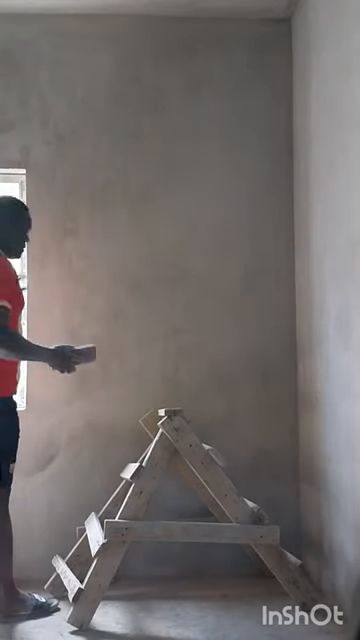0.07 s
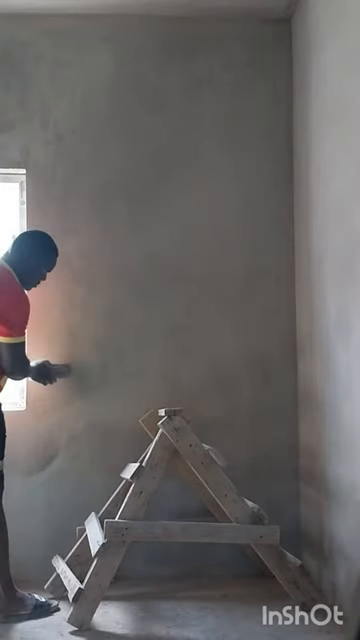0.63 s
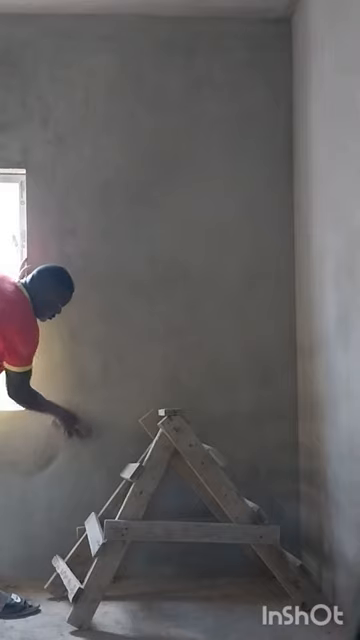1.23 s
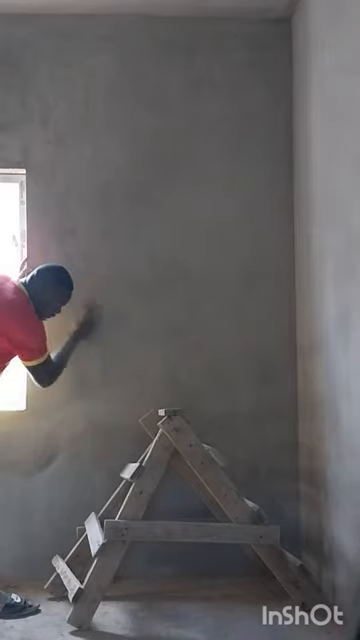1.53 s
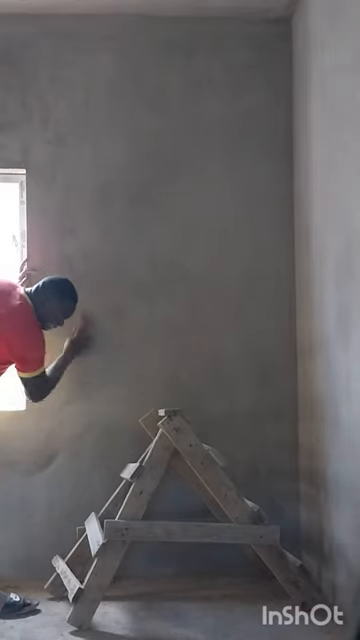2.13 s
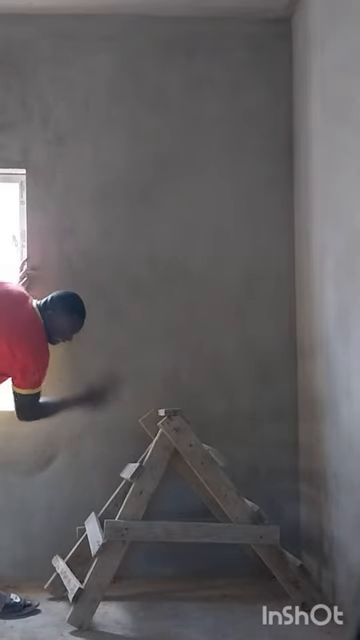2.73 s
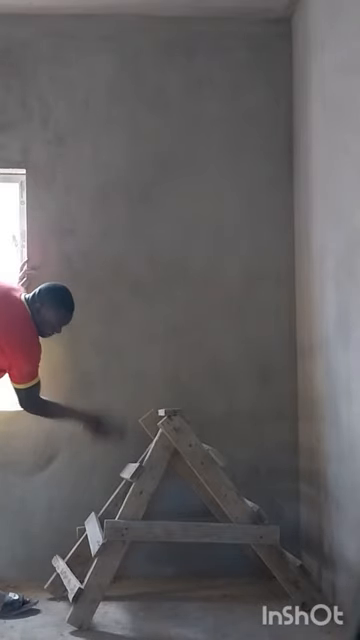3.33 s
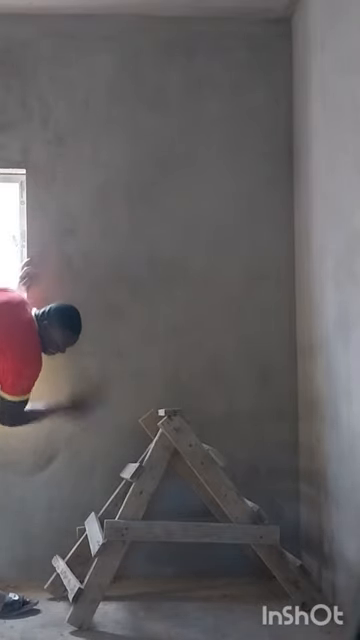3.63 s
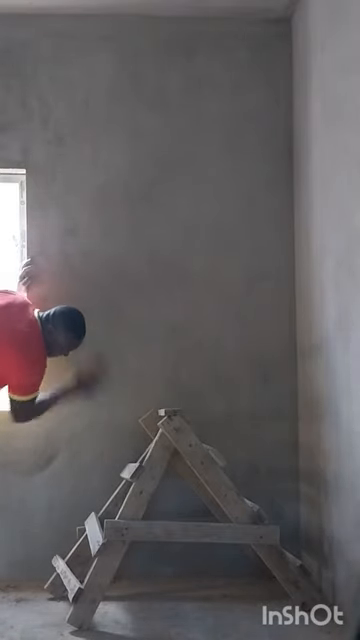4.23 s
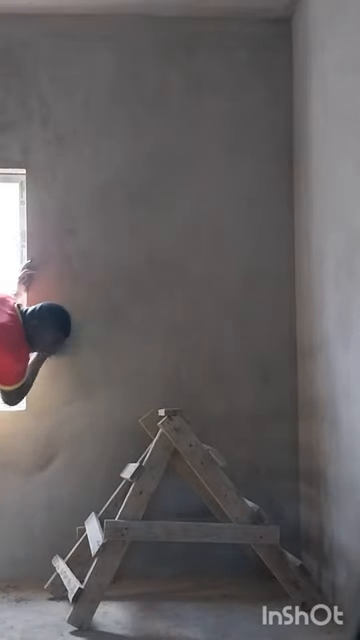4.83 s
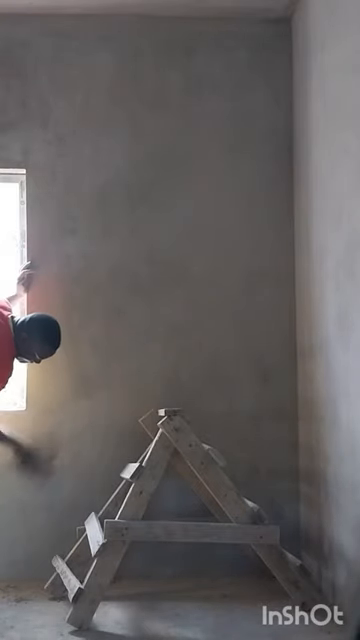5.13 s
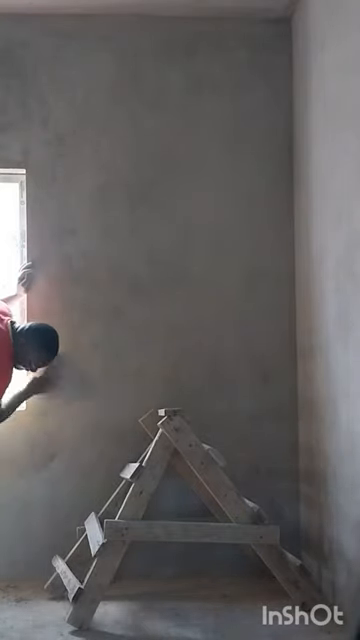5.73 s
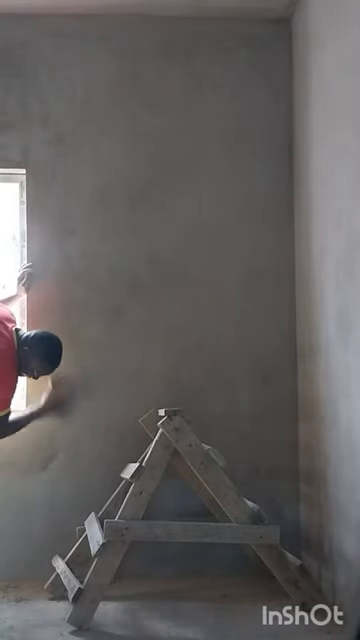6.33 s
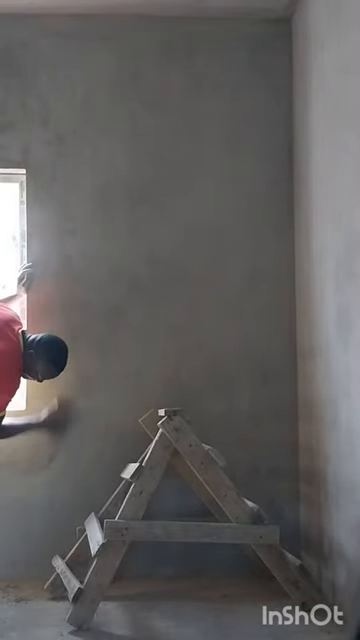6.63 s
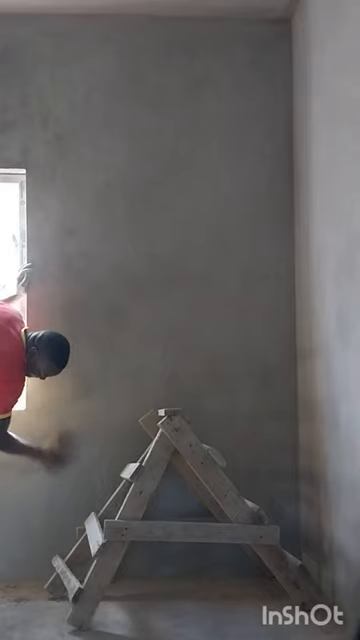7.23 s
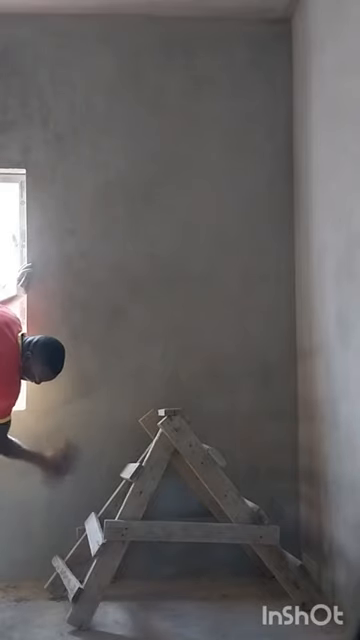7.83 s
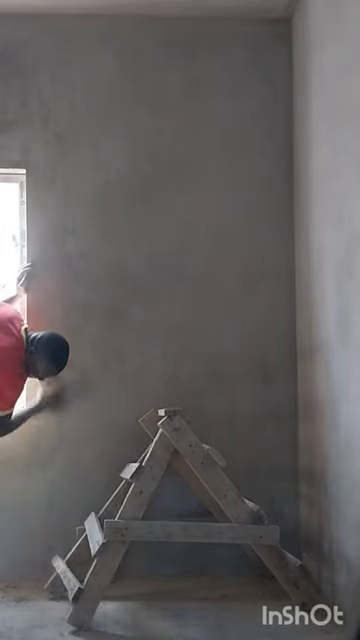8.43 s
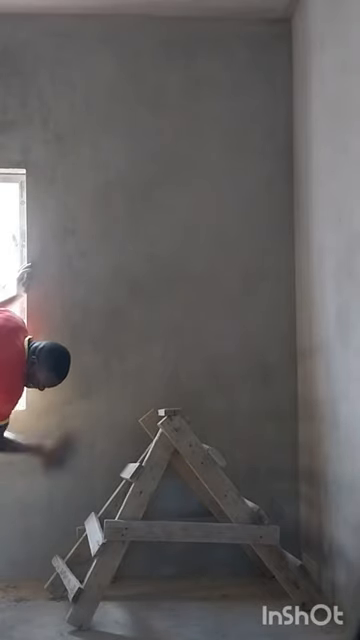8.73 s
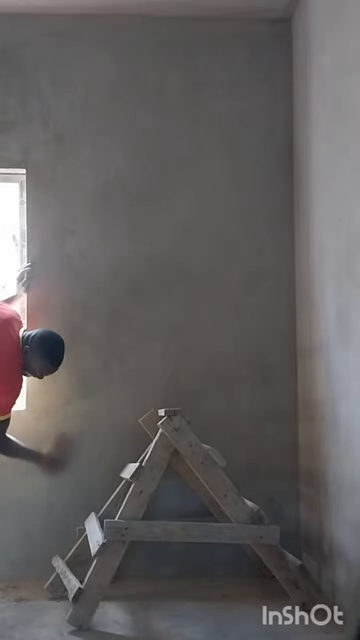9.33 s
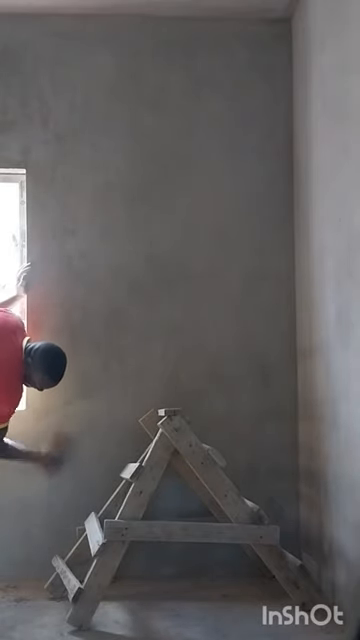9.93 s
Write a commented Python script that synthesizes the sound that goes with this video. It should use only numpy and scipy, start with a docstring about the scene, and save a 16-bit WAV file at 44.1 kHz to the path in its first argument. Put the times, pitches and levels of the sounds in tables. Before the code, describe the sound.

In a bare, echoing room, a block is handled softly and then rubbed to and fro over a cement-plastered wall. The first scrape is rough, and the long hissing strokes that follow become short and quick later on. Sand grains rasp under the block, with an occasional thin zing and a slight low rumble from the rubbing. The microphone is a few metres off, and a faint hum wavers in the background.

```python
"""A hand-held block scrubs to and fro over a cement-plastered wall in a bare, echoing room.
After a little handling it meets the wall with a gruff scrape; long arcs then turn into short strokes.
Sand grains catch and snap under it, making a gritty hiss and shaking the block and the wall.
Now and then a hard grain drags with a zing. A faint hum wavers in the background.
A pair of microphones listens from a few metres away."""
import sys
import numpy as np
from scipy import signal
from scipy.fft import rfft, irfft, next_fast_len
from scipy.io import wavfile
from scipy.ndimage import uniform_filter1d

SR = 44100
rng = np.random.default_rng(int(sys.argv[2]) if len(sys.argv) > 2 else 0)


def materialize(psi):
    """Save the field psi as 16-bit PCM at rate SR to the path in sys.argv[1].

    A 1-D psi becomes a single channel; in a 2-D psi each row is a channel.
    """
    bounded = np.clip(np.atleast_2d(psi).T, -1, 1)
    quanta = np.round(bounded * 32767).astype(np.int16)
    wavfile.write(sys.argv[1], SR, quanta)


N = 440559
TIME = np.arange(N) / SR

# strokes, up and down in turn, each lasting until the next:
# t/s, moment of top speed/share of the stroke, pressure/dB, fineness of the sand/dB
STROKES = [(0.691, 0.93, -6, -3.5), (0.865, 0.6, 3.5, -1.2), (1.222, 0.49, 2.5, -3.5),
           (1.552, 0.43, 1.6, 1.6), (1.904, 0.68, -0.5, -1), (2.221, 0.52, 1, 1.5),
           (2.466, 0.53, 2.5, -2.1), (2.715, 0.56, 2, 0.9), (2.927, 0.36, 2.3, -1), (3.145, 0.73, 0.6, 2.3),
           (3.334, 0.44, 0.5, 0.5), (3.601, 0.61, 0.4, 3.5), (3.828, 0.36, 0.4, 0), (4.183, 0.71, -3, 5.7),
           (4.471, 0.51, 1.4, -0.3), (4.853, 0.77, -2, 3), (5.137, 0.54, 0.3, 0), (5.387, 0.77, -1, 2.5),
           (5.591, 0.61, -0.5, 1), (5.841, 0.53, -0.5, 3), (6.047, 0.49, 1, -1.5), (6.35, 0.7, 0.9, 0.7),
           (6.568, 0.5, -0.5, -0.7), (6.811, 0.69, -0.8, 1), (7.014, 0.42, 0.5, -3.3),
           (7.189, 0.59, 0.4, -2.5), (7.362, 0.53, 0.3, -2.5), (7.485, 0.63, 1.0, -2.5),
           (7.632, 0.54, 0.8, -3), (7.758, 0.65, 1.2, -2.5), (7.893, 0.55, 0.5, -1.5),
           (8.032, 0.77, 2.0, -0.3), (8.2, 0.56, 0, 1), (8.451, 0.57, 1.5, 0.6), (8.699, 0.64, 1.7, -3),
           (8.961, 0.62, 0, 1.5), (9.145, 0.38, 0, -1.8), (9.315, 0.52, 0.5, -2.6),
           (9.466, 0.42, -1.4, -1.0), (9.608, 0.52, -0.2, -3), (9.776, 0.54, -1.2, -1.5),
           (9.909, 0.74, 1.7, -4)]
# how each sand sound follows the hand: level/dB, then dB added per dB of speed, pressure, fineness
HISS_RESPONSE = (-13, 1.25, 0.66, 1.0)
SCRAPE_RESPONSE = (-16, 0.49, 1.0, 0.5)
RASP_RESPONSE = (-24.5, .02, 1, 0.2)
# tone colours of the rubbing and tapping noises: f/Hz, level/dB
HISS_COLOUR = [(6800, -28), (8200, 0.5), (10000, -4.5), (12200, -1), (13500, 0.5), (16000, 1)]
SCRAPE_COLOUR = [(1800, -22.5), (2800, -7.5), (3600, -4.5), (5000, 1), (7400, 1), (8400, -0.5), (10500, -1),
                 (12500, -4.5)]
RASP_COLOUR = [(700, -20), (1150, -17.5), (1450, -9), (1750, -5), (2100, 0), (2450, -0.5), (3000, -2),
               (3800, -4), (6000, -15)]
EDGE_COLOUR = [(200, -11), (420, -11), (560, -7), (900, -6.5), (1080, -6.5), (1300, -5.5), (1550, 0.5),
               (1900, -2), (2500, -5.5), (4000, -9), (8000, -28)]
RUMBLE_COLOUR = [(20, -24), (38, -14), (52, 3), (72, -4), (98, 5.5), (110, -7), (123, 9.5), (140, 1.5),
                 (165, -1), (220, -50)]
TAP_COLOUR = [(200, -9), (700, 3), (1800, -1), (4000, -9), (7000, -20), (12000, -37)]
# the block first shuffles in the hand: t/s, half length/s, hiss/dB, scrape/dB, edge/dB
SHUFFLES = [(0.0, 0.042, -68, -59, -31.5), (0.163, 0.055, -54, -42.5, -40), (.5, 0.049, -67, -60, -47),
            (.63, 0.11, -67, -54, -40)]
# the block bites into coarse spots: t/s, half length/s, level/dB
BITES = [(.78, 0.03, -25), (1.01, 0.047, -24), (1.83, 0.043, -26.5), (2.41, 0.017, -18.5),
         (2.53, 0.03, -21.5), (3.42, 0.067, -27), (3.88, .06, -26), (4.43, 0.026, -20.5),
         (4.55, 0.045, -28.5), (5.2, 0.03, -40)]
# how easily things shake as the hand works down the wall: t/s, block/dB, wall/dB, rumble/dB
SHAKING = [(0.0, -45, -41, -45), (0.4, -55.5, -48.5, -49), (0.68, -41, -38, -46), (0.88, -27, -24.5, -40),
           (1.08, -45, -41, -42), (2.1, -40, -48, -58), (2.45, -46, -42.5, -50), (3.3, -50, -44, -52),
           (3.9, -38, -42, -47), (5.0, -38.5, -40, -51), (5.7, -46, -37, -52), (6.3, -37, -38.5, -50),
           (6.9, -29.5, -43, -47.5), (7.7, -30.5, -52, -50), (8.4, -32, -42, -50), (9.1, -30, -43.5, -51),
           (9.98, -30, -49, -48.5)]
# the notes at which the block, the wall and a hollow patch ring: f/Hz, width/Hz, level/dB
BLOCK_MODES = [(510, 150, -15), (655, 150, -3), (832, 120, 0), (909, 143, -0.5), (1237, 124, -1.5),
               (1745, 153, 1), (2280, 290, -0.5), (3310, 170, 4)]
WALL_MODES = [(176, 55, -1), (224, 59, 0), (265, 44, -2), (339, 40, -2), (428, 300, -12.5)]
PATCH_MODES = [(223.5, 30, 0)]
# how well their shaking passes into the air: f/Hz, level/dB
RADIATION = [(60, -22), (120, -21), (180, -2), (2400, 3.5), (4000, -8), (9000, -36)]
# dull thuds as weight shifts: t/s, half length/s, level/dB
THUDS = [(.275, 0.044, -40), (0.814, 0.043, -37.5), (2.81, .03, -39), (4.39, 0.032, -41), (5.3, .05, -48),
         (6.52, .035, -42), (9.464, 0.04, -48)]
# hard grains dragging: t/s, f/Hz, level/dB
ZINGS = [(.75, 3040, -31), (1.82, 4490, -16), (2.55, 2650, -26), (3.22, 7500, -35), (4.28, 7040, -31),
         (4.97, 6250, -29.5), (9.1, 7400, -22)]
# light taps as the block is gripped: t/s, level/dB
TAPS = [(0.476, -29.5), (0.596, -28)]
# tones of the hum: f/Hz, half the filter width/Hz, starting level/dB, fade/(dB per s)
HUM_TONES = [(124.3, 4.5, -48.5, 2.3), (339.6, 6.7, -50.5, 2), (503, 9.7, -49.5, 14)]
# how alike the echo is on the left and right: f/Hz, likeness (-1 to 1)
ECHO_LIKENESS = [(60, 0.51), (350, 0.88), (700, 0.67), (880, 0.019), (1100, -0.53), (1500, 0.15),
                 (2300, 0.074), (3500, -0.024)]
# tone colour of the two microphones: f/Hz, left/dB, right/dB
MIC_COLOUR = [(100, -2.2, 0.5), (550, -3, 3.5), (1200, 0, 5.5), (2200, -2.5, 3.5), (3370, -0.5, 5),
              (4720, 2, 5.5), (6160, 0, 5.5), (7180, 1, 9), (7610, -5.5, 7), (8300, -15, -4),
              (9000, -8.5, -5.5), (10100, -7, -0.1), (11700, -6.5, 1.9), (12440, -3.5, 5.5),
              (13300, -4, 6.5), (14700, -9.5, 1.5), (16000, -20, 5.5)]

TOUCH_S, TOUCH_ATTACK_S, LAST_STROKE_S = .714, .0072, .17   # the block meets the wall already moving
TURN_SPEED, CRUISE_PER_S = .022, 2   # share of top speed left at a turn; long strokes stay fast longer
LEAN_DB_PER_S, LEAN_LAG_STROKES = 5.5, .097   # the arm leans hardest just past the bottom of a long arc


def scrubbing():
    """One moving hand drives the sand, the ringing block and wall, and a low rumble."""
    contact, speed_db, press_db, fine_db = hand()
    pace = from_db(.27 * speed_db)   # a faster stroke meets more grains
    # the block judders over bumps and breaks off tiny clumps of sand
    catch = from_db(.65 * drift(71.66) + 1.5 * drift(1091))
    return (sand(contact, speed_db, press_db, fine_db, pace, catch)
            + block_and_wall(speed_db, press_db, pace, catch) + rumble(speed_db, press_db, pace, catch))


def hand():
    """Each stroke speeds up, then slows. Gives contact (0-1), then speed, pressure and fineness in dB."""
    starts, fastest, strength_db, fine_db = np.transpose(STROKES)
    turns = np.append(starts, starts[-1] + LAST_STROKE_S)
    phase = np.interp(TIME, turns, np.arange(len(turns)))
    stroke = np.minimum(phase.astype(int), len(starts) - 1)
    length_s = np.diff(turns)[stroke]
    done, top = phase - stroke, np.clip(fastest, .1, .9)[stroke]
    arch = np.sin(np.pi / 2 * np.minimum(done / top, (1 - done) / (1 - top)))
    cruise = .01 + CRUISE_PER_S * length_s
    arch = np.tanh(cruise * arch) / np.tanh(cruise)   # flatten the top
    speed_db = 20 * np.log10(TURN_SPEED + (1 - TURN_SPEED) * arch)
    lean_db = LEAN_DB_PER_S * length_s * np.cos(np.pi * (phase - LEAN_LAG_STROKES))
    # pressure and sand blend from one stroke into the next
    press_db, sand_db = uniform_filter1d([strength_db[stroke] + lean_db, fine_db[stroke]], int(.06 * SR))
    contact = np.clip((TIME - TOUCH_S) / TOUCH_ATTACK_S, 0, 1)
    return contact, *np.where(TIME >= TOUCH_S, [speed_db, press_db, sand_db], 0)


def sand(contact, speed_db, press_db, fine_db, pace, catch):
    """Grains hiss, scrape and rasp under the block and its edge. The bright hiss has the shortest echo."""
    hiss_gain, scrape_gain, rasp_gain = [
        contact * from_db(db + by_speed * speed_db + by_press * press_db + by_fine * fine_db)
        for db, by_speed, by_press, by_fine in (HISS_RESPONSE, SCRAPE_RESPONSE, RASP_RESPONSE)]
    hiss_shuffle, scrape_shuffle, edge_shuffle = sum(
        np.outer(from_db(levels), swell(s, half_s)) for s, half_s, *levels in SHUFFLES)
    bites = sum(from_db(db) * swell(s, half_s) for s, half_s, db in BITES)
    hiss = (hiss_gain + hiss_shuffle) * grit(HISS_COLOUR, 16000 * pace, catch, spread_db=1)
    scrape = (scrape_gain + scrape_shuffle) * grit(SCRAPE_COLOUR, 13500 * pace, catch, spread_db=2.5)
    rasp = (rasp_gain + bites) * grit(RASP_COLOUR, 8000 * pace, catch, spread_db=2)
    edge = (edge_dig() + edge_shuffle) * grit(EDGE_COLOUR, 3500, catch, spread_db=-2)
    return room(hiss, t60=.26) + room(scrape, t60=.55) + room(rasp, t60=.48) + room(edge, t60=1)


def grains(per_s, spread_db):
    """Grains snap at random moments. A spread above 0 makes a few louder, below 0 a few softer."""
    chance = np.clip(per_s / SR, 1e-3, 1)
    sizes = from_db(spread_db * np.minimum(rng.exponential(1, N), 5.5)) * rng.choice([-1, 1], N)
    return rms_one((rng.random(N) < chance) * sizes / np.sqrt(chance))   # same power at any rate


def grit(colour, per_s, catch, spread_db):
    """A stream of grains with one tone colour, louder where the block catches."""
    return rms_one(coloured(grains(per_s, spread_db) * catch, colour))


def edge_dig(start_s=.866, level_db=-17, attack_s=.043, hold_s=.065, release_s=.03):
    """Loudness of the edge digging into the plaster on the first downstroke: catch, hold, let go."""
    outside = np.maximum((start_s - TIME) / attack_s, (TIME - start_s - hold_s) / release_s)
    return from_db(level_db) * np.exp(-np.clip(outside, 0, 20))


def block_and_wall(speed_db, press_db, pace, catch, patch_s=3.5):
    """Grains set the block and wall ringing; a hollow patch booms as the block passes over it."""
    block_db, wall_db, _ = in_time(SHAKING)
    block_gain = from_db(block_db + .1 * speed_db + .65 * press_db)
    wall_gain = from_db(wall_db + .18 * speed_db + .63 * press_db)
    patch_gain = from_db(-37 - 6 * np.abs(TIME - patch_s))
    block = block_gain * resonate(grains(4000 * pace, spread_db=3) * catch, BLOCK_MODES)
    wall = wall_gain * resonate(grains(1500 * pace, spread_db=-.5), WALL_MODES)
    patch = patch_gain * resonate(grains(1500 * pace, spread_db=4.5), PATCH_MODES)
    return sum(room(coloured(part, RADIATION), t60=.74) for part in (block, wall, patch))


def rumble(speed_db, press_db, pace, catch):
    """The rubbing makes a deep shaking, with thuds as weight shifts."""
    _, _, rumble_db = in_time(SHAKING)
    gain = from_db(rumble_db + .52 * speed_db + .41 * press_db)
    thuds = sum(from_db(db) * swell(s, half_s) for s, half_s, db in THUDS)
    return room((gain + thuds) * grit(RUMBLE_COLOUR, 900 * pace, catch, spread_db=-2), t60=.32)


def zings():
    """A hard grain drags and makes the block sing briefly around one pitch."""
    return sum(from_db(db) * swell(s, half_s=.031) * narrow_noise(hz, filter_width_hz=720)
               for s, hz, db in ZINGS)


def taps(decay_s=.021):
    """Gripping the block makes short bursts of noise."""
    force = sum(from_db(db) * (TIME >= s) * np.exp(-np.abs(TIME - s) / decay_s) for s, db in TAPS)
    return force * rms_one(coloured(rng.standard_normal(N), TAP_COLOUR))


def hum():
    """Faint wavering tones slowly die away."""
    return sum(narrow_noise(hz, 2 * half_width) * from_db(db - fade * TIME)
               for hz, half_width, db, fade in HUM_TONES)


def room(x, t60, direct_db=-9, early_db=-5, early_t60=.035, tail_db=-2, left_lead_s=.000328):
    """Sound arrives directly, then off the near walls, then as a long echo."""
    size = next_fast_len(N + SR // 10, real=True)
    hz, spectrum = np.arange(size // 2 + 1) * SR / size, rfft(x, size)
    direct = irfft(spectrum * np.exp(-2j * np.pi * hz * [[0], [left_lead_s]]), size)[:, :N]
    # the hand keeps moving, so the echoes blur into noise with the colour of their source
    colour = np.sqrt(np.abs(uniform_filter1d(np.abs(spectrum) ** 2, size=141)))
    alike = np.clip(at_hz(ECHO_LIKENESS, hz), -.99, .99)
    mid, side = rfft(rng.standard_normal((2, size)))
    stereo_noise = np.sqrt(1 + alike) * mid + np.sqrt(1 - alike) * side * [[1], [-1]]
    echoes = irfft(colour * stereo_noise, size)[:, :N]
    early = from_db(early_db) ** 2 * lingering(x ** 2, early_t60)
    tail = from_db(tail_db) ** 2 * lingering(x ** 2, t60)
    # an echo cannot swell faster than a few of its own cycles
    cycle_s = 1 / np.average(hz, weights=colour ** 2)
    energy = np.abs(uniform_filter1d(early + tail, size=1 + int(4 * cycle_s * SR)))
    return from_db(direct_db) * direct + np.sqrt(energy) * rms_one(echoes)


def lingering(power, t60):
    """Sound energy dies away by 60 dB in t60 seconds."""
    keep = from_db(-120 / (t60 * SR))
    return signal.lfilter([1 - keep], [1, -keep], power)


def resonate(x, modes):
    """Let x ring at several notes at once, added with alternating signs; the result has power 1."""
    out = 0
    for k, (hz, width, db) in enumerate(modes):
        keep = np.exp(-np.pi * width / SR)
        feedback = [1, -2 * keep * np.cos(2 * np.pi * hz / SR), keep * keep]
        out = out + (-1) ** k * from_db(db) * signal.lfilter([1 - keep, 0, keep - 1], feedback, x)
    return rms_one(out)


def narrow_noise(hz, filter_width_hz):
    """Noise filtered twice around one pitch becomes a wavering tone."""
    mode = [(hz, filter_width_hz, 0)]
    return resonate(resonate(rng.standard_normal(N), mode), mode)


def coloured(x, colour):
    """Filter x by a curve of f/Hz, level/dB."""
    size = next_fast_len(N + SR // 10)
    hz = np.arange(size // 2 + 1) * SR / size
    return irfft(rfft(x, size) * from_db(at_hz(colour, hz)), size)[..., :N]


def drift(per_s):
    """A random wobble of size about 1 that takes per_s steps a second."""
    knots = rng.standard_normal(N // 10)
    return np.interp(TIME * per_s, np.arange(len(knots)), knots) * np.sqrt(3 / 2)


def swell(s, half_s):
    """A smooth rise and fall, reaching 1 at time s."""
    return np.exp(-np.minimum(((TIME - s) / half_s) ** 2, 50))


def in_time(rows):
    """Read each column of a time table at every sample."""
    s, *columns = np.transpose(rows)
    return [np.interp(TIME, s, column) for column in columns]


def at_hz(points, hz):
    """Read a frequency table, with octaves evenly spaced."""
    table_hz, values = np.transpose(points)
    return np.interp(np.log(hz + 1e-6), np.log(table_hz), values)


def from_db(db):
    """Turn decibels into a gain."""
    return 10 ** (np.asarray(db) / 20)


def rms_one(x):
    """Scale x to an average power of 1."""
    return x / np.sqrt(np.mean(x ** 2) + 1e-20)


def scene():
    """Scrubbing and handling ring through the bare room, over a faint hum."""
    return scrubbing() + room(zings(), t60=1) + room(taps(), t60=1, direct_db=-14) + hum()


def record(dry, low_cut_hz=48, high_cut_hz=15850):
    """Each microphone colours its side and clips overloads; the deepest bass and top treble are cut."""
    mics = np.array(MIC_COLOUR)
    heard = np.array([coloured(dry[side], mics[:, [0, side + 1]]) for side in range(2)])
    low_cut = signal.butter(2, low_cut_hz, "high", fs=SR, output="sos")
    high_cut = signal.ellip(12, .1, 80, high_cut_hz, fs=SR, output="sos")
    return signal.sosfilt(high_cut, signal.sosfilt(low_cut, np.clip(heard, -1, 1)))


dry = scene()
out = record(dry)
materialize(out)
```